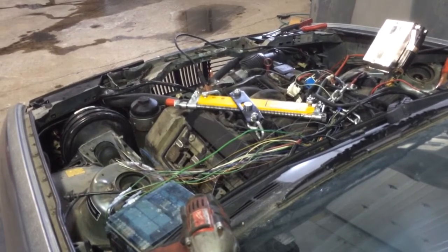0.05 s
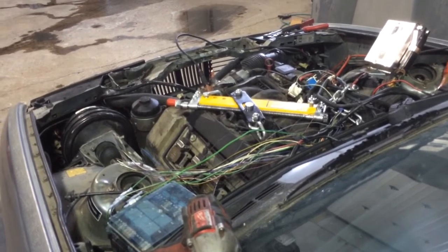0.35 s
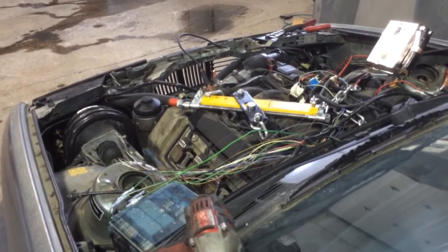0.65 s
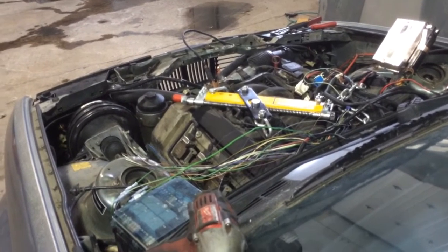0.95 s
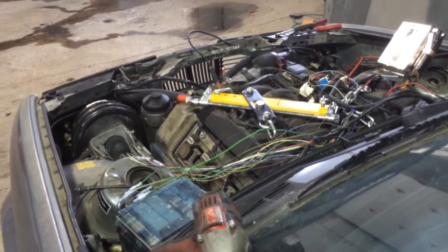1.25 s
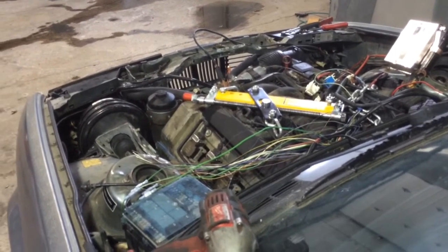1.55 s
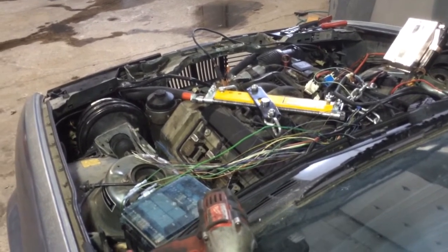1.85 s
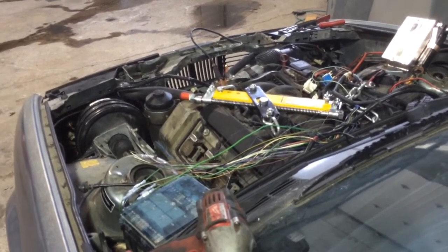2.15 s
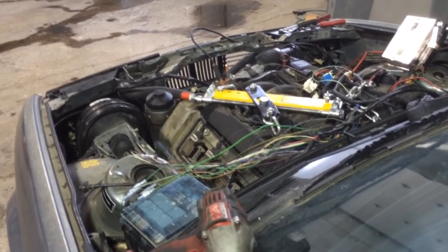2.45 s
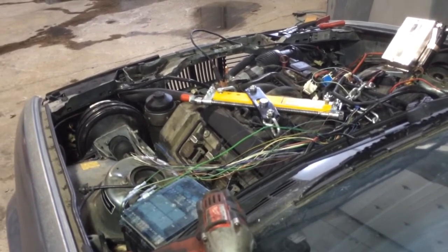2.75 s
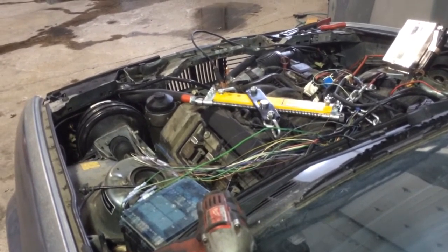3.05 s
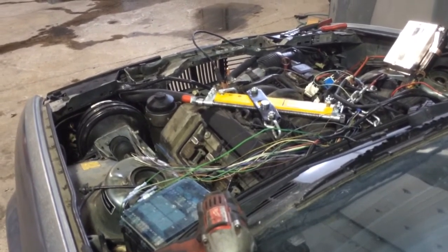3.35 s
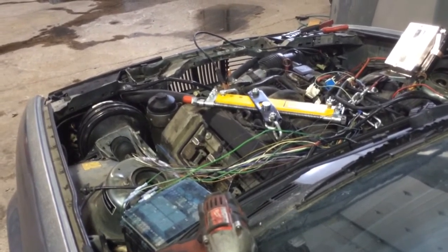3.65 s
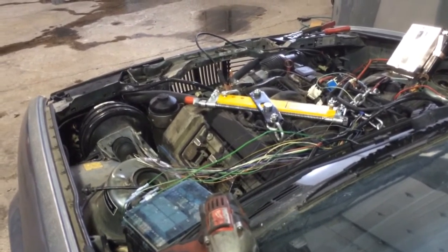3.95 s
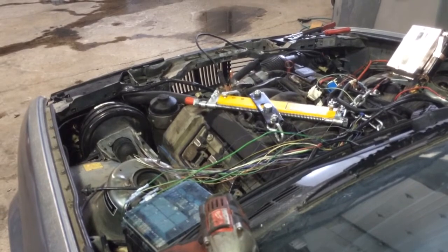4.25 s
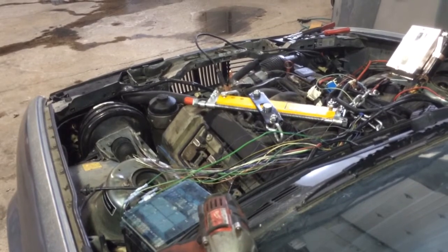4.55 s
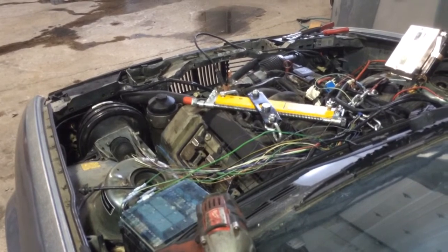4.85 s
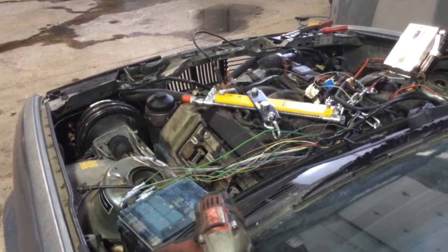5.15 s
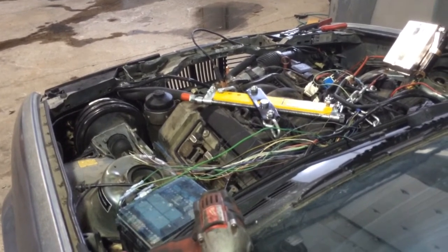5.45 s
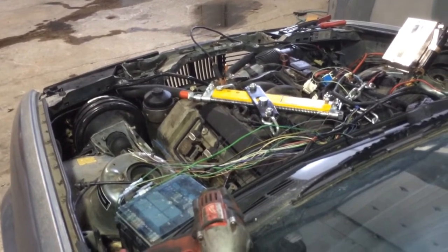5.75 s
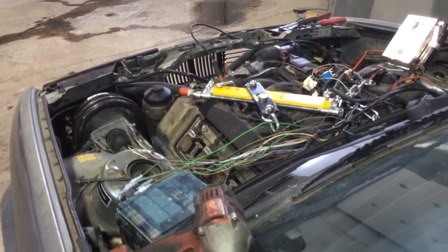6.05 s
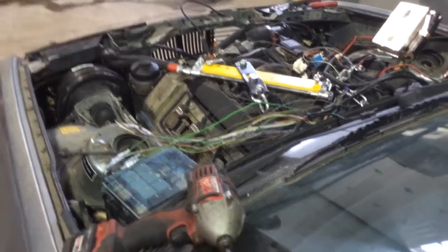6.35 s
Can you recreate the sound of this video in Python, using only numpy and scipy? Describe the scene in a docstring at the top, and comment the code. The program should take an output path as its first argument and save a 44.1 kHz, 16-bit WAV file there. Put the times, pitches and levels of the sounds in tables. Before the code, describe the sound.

Faint machinery hum and a few clicks, then a car engine cranks, fires up with spitting pops, roars and begins to ease off.

```python
"""A workshop yard, where machinery hums and an eight-cylinder engine is started with its bonnet open.
Switch contacts click, then the starter's pinion slams in and its teeth grind for half a second.
The engine catches, spits, flares into a lumpy roar and begins to fall back. Its firings drive the
resonances of pipe, muffler and metal covers; unequal cylinders make the roar lumpy, and misfires
and knocks crack out above it."""
import sys
import numpy as np
from scipy import signal
from scipy.fft import rfft, irfft, next_fast_len
from scipy.io import wavfile
from scipy.ndimage import map_coordinates

SR = 44100
rng = np.random.default_rng(int(sys.argv[2]) if len(sys.argv) > 2 else 0)


def wav_out(sig):
    """Save sig, one row per channel (or a flat mono array), as 16-bit PCM at SR to the path in sys.argv[1]."""
    wavfile.write(sys.argv[1], SR, np.round(np.clip(np.atleast_2d(sig).T, -1, 1) * 32767).astype(np.int16))


N = 281799
T = np.arange(N) / SR

# outdoor rumble: frequency_hz, level_db
YARD_SPECTRUM = [(12, -59), (20, -17), (30, -45), (38, -12), (122, -1.5), (245, -5.5), (266, -7.5),
                 (306, -9.5), (333, -12.5), (478, -11.5), (519, -17), (581, -15.5), (746, -17), (1920, -20),
                 (15500, -54.5)]
# machinery hum: pitch_hz, rms_db
HUM_PARTIALS = [(53.5, -58.5), (79, -55), (120, -55.5), (152, -61), (187, -56.5), (210, -61), (240, -62.5),
                (311, -64), (431, -77.5), (573, -70), (700, -75), (1680, -70.5), (1900, -82), (2400, -78.5)]
# machinery whirr: frequency_hz, gain_db
WHIRR_BAND = [(1400, -18), (1800, 0), (2000, 5), (2600, -30)]
# switch and relay contacts: start_s, level_db, body_db, snap_db
CLICKS = [(1.178, -27, -16, -10.5), (1.179, -25.5, -13, -15.5), (4.352, -28.5, -2, -25),
          (4.358, -25.5, -5, -30), (4.477, -28.5, -8.5, -12.5), (4.537, -46.5, 8.5, -24)]
# switch casing: pitch_hz, width_hz, gain_db
CASING_MODES = [(613, 50, 6), (870, 88, 7.5), (1380, 190, 4.5), (1950, 190, 11.5), (2270, 69, -5.5),
                (4300, 170, -48)]
# contact snap: frequency_hz, level_db
SNAP_SPECTRUM = [(1500, -3), (3000, -5), (4500, 1), (5800, -11), (7300, 1), (10000, -16), (15000, -7)]

# the solenoid throws the pinion into the ring gear: start_s, level_db, t60_s
SLAMS = [(4.562, -28, 0.23), (4.575, -12, 0.092), (4.583, -14, 0.1), (4.606, -29, 0.25)]
# pinion impact: frequency_hz, level_db
PINION_SPECTRUM = [(120, -53), (200, -21), (677, -7.5), (1050, -9), (1280, -5.5), (2060, -2.5),
                   (2290, -8.5), (3480, 0), (3750, -10), (4660, -6), (5800, -11), (14400, -26.5),
                   (15500, -30)]
# the block taking the load: pitch_hz, width_hz, gain_db
BLOCK_MODES = [(94.8, 60, -8), (720, 53, 1), (870, 43, 5), (1130, 90, 0), (1470, 56, -20), (2110, 94, -19)]
# the starter labours over each compression: centre_s, swell_db, whine_db
COMPRESSIONS = [(4.7, 1, -28.5), (4.806, 3, -24.5), (4.925, 2.5, -31), (5.028, 5, -26)]
# rattling housing: frequency_hz, gain_db
HOUSING_SPECTRUM = [(180, -19.5), (300, -11.5), (391, -18.5), (526, -8), (581, -16), (674, -7), (863, -3),
                    (1050, -5.5), (1370, -1.5), (2070, -5), (2690, -11), (4880, -14.5), (8280, -28.5),
                    (13100, -30), (15500, -45)]
# bell housing: pitch_hz, width_hz, gain_db
BELL_MODES = [(705, 56, 1), (866, 61, 6), (1333, 130, -2.5)]
# its growl: frequency_hz, gain_db
GROWL_BAND = [(420, -35), (650, 8.5), (1400, 1.0), (2800, -29)]
# gear whine: tooth_rate_multiple, level_db
GEAR_HARMONICS = [(2, 3.5), (3, 2.5), (4, 5.5), (5, 5), (6, -3)]

# engine speed: time_s, four_stroke_cycle_hz
CYCLE_RATE = [(4.55, 4), (5.05, 5), (5.14, 8.9), (5.45, 9.7), (5.62, 11.45), (5.77, 12.08), (6.1, 11.95),
              (6.2, 10.8), (6.39, 9.5)]
# the pipe chuffs during cranking: start_s, level_db, t60_s
CHUFFS = [(4.592, -28, 0.27), (4.785, -22.5, 0.68), (4.915, -26.5, 0.53), (5.075, -23.5, 0.25)]
# unequal cylinders fill the orders around the eighth, the firing rate: cycle_rate_multiple, level_db
ENGINE_ORDERS = [(3, -2.5), (4, -4.5), (5, -9), (6, -1.5), (7, -5), (8, 3), (9, -8), (10, -6), (11, -9),
                 (12, -3.5), (13, -3.5), (14, -4), (15, -5.5), (16, -2.5), (17, -16), (18, -13), (19, -2.5),
                 (20, -11.5), (21, -9), (22, -31), (23, -16), (24, -12), (25, -19), (26, -8.5), (27, -12),
                 (28, -13.5), (29, -8.5), (31, -15), (32, -14), (33, -26), (37, -21.5), (38, -13),
                 (44, -12.5), (46, -19)]
# cylinders in firing order: strength_db
CYLINDERS = [2.5, 2.5, -0.5, 2, 3.5, -0.5, -4.5, 2]
# exhaust boom of the running engine: time_s, level_db
BOOM_LEVELS = [(5.15, -16.5), (5.166, -12), (5.44, -10.5), (5.684, -14.5), (6.096, -12.5), (6.206, -16.5),
               (6.238, -23.5), (6.39, -14.5)]
# exhaust pipe: pitch_hz, width_hz, gain_db
PIPE_MODES = [(116.5, 9.8, 6.5), (185, 400, -13.5)]
# muffler: pitch_hz, width_hz, gain_db
MUFFLER_MODES = [(175, 61, -4.5), (240, 49, 7.5), (321.7, 34, 0.5), (368, 65, -19), (512, 36, -5.5),
                 (711, 73, -3.5)]
# its burble: frequency_hz, gain_db
BURBLE_BAND = [(90, -29), (150, 1.5), (750, 2.0), (1500, -16)]
# intake air: frequency_hz, level_db
INTAKE_SPECTRUM = [(2000, -15), (5000, 0), (9000, -4), (15000, -14)]
# parts around the engine: frequency_hz, gain_db
BAY_SPECTRUM = [(350, -12.5), (600, -2.5), (726, -6), (809, -10), (1020, -6), (1220, -1.5), (1390, -7),
                (1910, -6), (2470, -12), (3160, -9), (3520, -12), (4090, -13), (6950, -17), (14500, -31),
                (15500, -31)]
# covers and brackets: pitch_hz, width_hz, level_db
COVER_MODES = [(1125, 17.7, 0.5), (1488, 18, 1), (1595, 39, 1.5), (1784, 22, -1), (1860, 29, -0.5),
               (2123, 28, 0.5), (2322, 32, 1.5), (2494, 17, -8), (2700, 19, -7), (3090, 80, -8)]

# single misfires, most as the engine catches: start_s, level_db, treble_db, ring_hz
MISFIRES = [(5.1285, -17, -4, 1746), (5.161, -15, -13, 1520), (5.2268, -12, -10, 1898),
            (5.252, -16.5, -0.5, 2340), (5.2977, -17, -10.5, 1470), (5.3193, -15, -15, 1447),
            (5.3994, -19.5, 3, 1540), (5.654, -9.5, -12.5, 1910), (6.121, -15, -18, 1840)]
# three cylinders knock under load: cycle_fraction, spit_db, crack_db, thud_db
KNOCKS = [(0.0, -17.5, -27, -37), (0.2, -30, -28, -25.5), (0.485, -27, -18, -23)]
# ring of a spit: pitch_hz, level_db
SPIT_PARTIALS = [(735, -13), (1130, -4), (1215, 1), (1300, -4)]
# hollow part of a knock: pitch_hz, width_hz, gain_db
THUD_MODES = [(532, 36, 1), (722, 64, 0)]
# crack and hiss of a pop: frequency_hz, level_db
CRACK_SPECTRUM = [(300, -7), (800, -10), (1900, -1), (3500, 3.0), (6000, -4.0), (15000, -31)]
HISS_SPECTRUM = [(2000, -7), (5000, -2.5), (9000, -4.5), (15000, -8)]

ENGAGE_S, RELEASE_S = 4.595, 5.045  # the pinion is in mesh between these times
TOOTH_FIRST_HZ, TOOTH_FREE_HZ, SPIN_UP_S = 190.1, 441, 0.47  # the starter nears its free speed
COMPRESSION_S, SAG_HZ = 0.036, 10  # half-width of a compression; its drag on the tooth rate
GRIND_DB, GRIND_EASE_DB_PER_S, RELEASE_DB_PER_S = -24.5, 11.5, 29
CATCH_S, OPEN_S = 5.124, 0.45  # the engine catches; time the throttle takes to open
LIFT_S, CLOSE_S = 6.145, 0.16  # the throttle is let go; time it takes to shut
BARK_DB, BARK_RANGE_DB = -17.5, 17.5  # gain at full throttle; how much less when shut
BAY_DB, BAY_RISE_DB, BAY_DROP_DB = -24.5, 3, 12  # gain at full throttle; less at the catch; less shut
KNOCK_FROM_S, KNOCK_TO_S, KNOCK_TREBLE_DB, KNOCK_RING_HZ = 5.42, 6.11, -11.5, 1840


def amp(db):
    """Decibels as an amplitude ratio."""
    return np.exp(np.asarray(db) * (np.log(10) / 20))


def unit(x):
    """x at rms 1."""
    return x / np.sqrt(np.mean(x ** 2) + 1e-20)


def noise():
    """White Gaussian noise."""
    return rng.standard_normal(N)


def wobble(rate):
    """A smooth random curve, rate knots a second."""
    coarse = T[::64]
    knots = rng.standard_normal(int(N * rate / SR) + 4)
    return np.interp(T, coarse, map_coordinates(knots, [coarse * rate]))


def curve(points):
    """Linear interpolation of (time_s, value) points."""
    return np.interp(T, *np.transpose(points))


def ramp(start, length):
    """A linear rise from 0 to 1."""
    return np.clip((T - start) / length, 0, 1)


def burst(s, t60, attack=0.0013):
    """A fast rise and an exponential decay."""
    age = np.maximum(T - s, 0)
    return (1 - np.exp(-age / attack)) * amp(-60 * age / t60)


def filtered(x, response):
    """x through a complex frequency response."""
    size = next_fast_len(N + SR // 2)
    return irfft(rfft(x, size) * response(np.fft.rfftfreq(size, 1 / SR)), size)[:N]


def coloured(x, points):
    """x shaped by (frequency_hz, gain_db) points."""
    f, db = np.transpose(points)
    return filtered(x, lambda hz: amp(np.interp(np.log(hz + 1), np.log(f), db)))


def resonate(x, modes):
    """Forced response of damped resonators in parallel."""
    return filtered(x, lambda f: sum(amp(db) * 1j * f * width / (hz * hz - f * f + 1j * f * width)
                                     for hz, width, db in modes))


def steady(x, span):
    """x held near rms 1 over every span seconds."""
    window = np.hanning(int(span * SR))
    power = np.abs(signal.fftconvolve(x * x, window / window.sum(), "same"))
    return x / np.sqrt(power + power.max() / 10 ** 5)


def scatter(x, t60):
    """Diffuse reflection among the parts under the bonnet."""
    t = T[:SR // 4]
    tail = rng.standard_normal(len(t)) * amp(-60 * t / t60)
    return signal.fftconvolve(x, tail / np.linalg.norm(tail))[:N]


def crossings(phase):
    """The samples at which phase passes a whole number."""
    return np.flatnonzero(np.diff(np.floor(phase)) > 0)


def pulses(at, sizes):
    """Impulses at the given samples."""
    return np.bincount(np.clip(at, 0, N - 1).astype(int), sizes, N)


def puffs(train, t60):
    """Each impulse releases decaying turbulence."""
    decay = amp(-60 * T[:SR // 5] / t60)
    return signal.fftconvolve(train, decay)[:N] * noise()


def yard(rumble_db=-48.5, waver_db=2, drift_cycles=0.15, whirr_db=-67):
    """Superposition: the wavering partials and narrow-band whirr of machinery over outdoor rumble."""
    hum = sum(amp(db + waver_db * wobble(3.92))
              * np.sin(2 * np.pi * (hz * T + drift_cycles * wobble(3.046))) for hz, db in HUM_PARTIALS)
    whirr = unit(coloured(resonate(noise(), [(1891, 38, 0)]), WHIRR_BAND))
    rumble = unit(coloured(noise(), YARD_SPECTRUM))
    return np.sqrt(2) * hum + amp(whirr_db) * whirr + amp(rumble_db) * rumble


def switches(body_gain_db=-2, snap_gain_db=1, body_t60=0.06, snap_t60=0.056):
    """Impact excitation: each contact snaps and rings the modes of its casing."""
    body = sum(amp(db + body_db) * burst(s, body_t60) for s, db, body_db, _ in CLICKS)
    snap = sum(amp(db + snap_db) * burst(s, snap_t60, attack=0.00087) for s, db, _, snap_db in CLICKS)
    body *= unit(resonate(noise(), CASING_MODES))
    snap *= unit(coloured(noise(), SNAP_SPECTRUM))
    return amp(body_gain_db) * body + amp(snap_gain_db) * snap


def pinion_slam(clunk_db=-17, clunk_t60=0.18):
    """Impact transients: the pinion strikes the ring gear, and the block rings as it takes the load."""
    strikes = sum(amp(db) * burst(s, t60, attack=0.0055) for s, db, t60 in SLAMS)
    slam = strikes * unit(coloured(noise(), PINION_SPECTRUM))
    block = steady(resonate(noise(), BLOCK_MODES), 0.1)
    return slam + amp(clunk_db) * burst(4.604, clunk_t60, attack=0.00088) * block


def starter(growl_db=-5, uneven_db=2, ring_t60=0.096, scrape=0.075):
    """Forced vibration: meshing teeth drive the housing, slower and harder on each compression."""
    age = np.maximum(T - ENGAGE_S, 0)
    centre_s, swell_db, whine_db = np.transpose(COMPRESSIONS)
    squeeze = np.exp(-((T - centre_s[:, None]) / COMPRESSION_S) ** 2)
    tooth_hz = TOOTH_FREE_HZ - (TOOTH_FREE_HZ - TOOTH_FIRST_HZ) * np.exp(-age / SPIN_UP_S)
    tooth_hz -= SAG_HZ * squeeze.sum(0)
    mesh = np.cumsum(tooth_hz * (1 + .022 * wobble(110))) / SR
    at = crossings(mesh)
    teeth = pulses(at + rng.normal(0, 7, len(at)), amp(uneven_db * rng.standard_normal(len(at))))
    contact = scatter(teeth, ring_t60) + scrape * puffs(teeth, 0.02)
    grind = steady(coloured(contact, HOUSING_SPECTRUM), 0.035)
    growl = steady(coloured(resonate(puffs(teeth, 0.0096), BELL_MODES), GROWL_BAND), 0.052)
    tones = sum(amp(db + 1.2 * wobble(25)) * np.sin(2 * np.pi * k * mesh) for k, db in GEAR_HARMONICS)
    whine = (amp(whine_db) @ squeeze) * steady(resonate(tones, BELL_MODES), 0.047)
    level_db = GRIND_DB - GRIND_EASE_DB_PER_S * age + swell_db @ squeeze  # eases as the engine turns
    rattle = amp(level_db) * (grind + amp(growl_db) * growl)
    engaged = ramp(ENGAGE_S, 0.0063) * amp(-RELEASE_DB_PER_S * np.maximum(T - RELEASE_S, 0))
    return engaged * (rattle + whine)


def crank(zero_s=5.883):
    """Phase integrates speed: four-stroke cycles, counted from the first cylinder's firing at zero_s."""
    cycle = np.cumsum(curve(CYCLE_RATE)) / SR
    return cycle - np.interp(zero_s, T, cycle)


def throttle():
    """From 0 (shut) to 1: opened as the engine catches, held, then let go."""
    return ramp(CATCH_S, OPEN_S) * (1 - ramp(LIFT_S, CLOSE_S))


def firings(jitter_s=.0007, uneven_db=4.0):
    """A quasi-periodic pulse train: eight firings a cycle, each early or late, weak or strong."""
    phase = len(CYLINDERS) * crank()
    at = crossings(phase)
    cylinder_db = np.array(CYLINDERS)[np.round(phase[at]).astype(int) % len(CYLINDERS)]
    late, strength = rng.standard_normal((len(at), 2)).T
    return pulses(at + jitter_s * SR * late, amp(cylinder_db + uneven_db * strength))


def exhaust(upper_db=-0.5, burble_db=-7, waver_db=2.5, split_hz=150, cough_db=-7, cough_t60=0.13):
    """Resonance: engine orders sweep through the pipe's modes; throttle adds bark and misfires cough."""
    cycle = crank()
    gas = sum(amp(db + waver_db * wobble(16))
              * np.sin(2 * np.pi * (k * cycle + rng.random()) + 0.23 * wobble(14))
              for k, db in ENGINE_ORDERS)
    pipe = resonate(gas, PIPE_MODES)
    low = filtered(pipe, lambda f: 1 / (1 + (f / split_hz) ** 8))
    boom = steady(low, .07)
    blows = firings()
    burble = coloured(resonate(blows + 0.056 * puffs(blows, 0.015), MUFFLER_MODES), BURBLE_BAND)
    bark = amp(upper_db) * steady(pipe - low, 0.14) + amp(burble_db) * steady(burble, 0.13)
    running = ramp(CATCH_S, 0.01)
    chuffs = sum(amp(db) * burst(s, t60, attack=0.0098) for s, db, t60 in CHUFFS)
    coughs = sum(amp(db + treble_db + cough_db) * burst(s, cough_t60) for s, db, treble_db, _ in MISFIRES)
    load = amp(BARK_DB - BARK_RANGE_DB * (1 - throttle()))
    return (chuffs + running * amp(curve(BOOM_LEVELS))) * boom + (coughs + running * load) * bark


def intake(air_db=-39):
    """Flow noise: air starts to hiss past the throttle just before the engine catches."""
    flow = ramp(4.92, 0.15) * (1 - ramp(5.6, .3))
    return amp(air_db) * flow * unit(coloured(noise(), INTAKE_SPECTRUM))


def engine_bay(rasp_db=-2.5, clatter_db=-5, metal_db=-5, waver_db=4, clatter_t60=0.32, throb_db=0.5):
    """Structure-borne sound: firings rasp and rattle nearby parts, throbbing once a crankshaft turn."""
    blows = firings(jitter_s=.00006, uneven_db=1.5)
    rasp = amp(rasp_db) * steady(coloured(puffs(blows, 0.39), BAY_SPECTRUM), 0.26)
    # parts ring alike on every firing, which gives a line spectrum
    clatter = amp(clatter_db) * steady(coloured(scatter(blows, clatter_t60), BAY_SPECTRUM), 0.32)
    # each cover rings on after a firing, now harder, now softer
    struck = signal.fftconvolve(blows, burst(0, .07)[:SR // 4])[:N]
    rings = sum(amp(db + waver_db * wobble(30)) * np.sin(2 * np.pi * hz * T + 1.73 * wobble(2 * width))
                for hz, width, db in COVER_MODES)
    metal = amp(metal_db) * steady(struck * rings, 0.41)
    turns = 2 * (crank() - 0.12)
    level_db = BAY_DB - BAY_RISE_DB * (1 - ramp(CATCH_S, OPEN_S)) - BAY_DROP_DB * ramp(LIFT_S, CLOSE_S)
    level_db += throb_db * throttle() * np.cos(2 * np.pi * turns)
    return ramp(CATCH_S, 0.018) * amp(level_db) * (rasp + clatter + metal)


def knocks(spread_db=1.6):
    """Knocks recur with the cycle; a row for each: start_s, spit_db, crack_db, thud_db."""
    cycle = crank()
    rows = [(s, *levels_db) for place, *levels_db in KNOCKS
            for s in T[crossings(cycle - place)] if KNOCK_FROM_S < s < KNOCK_TO_S]
    return np.array(rows) + spread_db * rng.standard_normal((len(rows), 1)) * [0, 1, 1, 1]


def spits(gain_db=3, t60=0.061, attack=0.0019, misfire_db=-11, thud_t60=0.094):
    """Damped ringing: misfires and knocks spit with a brief pitch; knocks also thud hollowly."""
    tones = sum(amp(db) * np.sin(2 * np.pi * hz * T + 1.87 * wobble(120)) for hz, db in SPIT_PARTIALS)
    knock_rows = knocks()
    blows = [(s, db) for s, db, _, _ in knock_rows] + [(s, db + misfire_db) for s, db, _, _ in MISFIRES]
    spit = steady(tones, 0.026) * sum(amp(db) * burst(s, t60, attack) for s, db in blows)
    thuds = sum(amp(db) * burst(s, thud_t60, attack) for s, _, _, db in knock_rows)
    return amp(gain_db) * spit + thuds * steady(resonate(noise(), THUD_MODES), .04)


def pops(crack_db=-7, hiss_db=-5, ring_db=-8, crack_t60=0.076, hiss_t60=0.15, ring_t60=0.067):
    """Impulsive excitation: misfires and knocks crack and hiss over a broad band and ring the metal."""
    t = T[:SR // 6]
    rise = 1 - np.exp(-t / 0.002)
    crack, hiss, ring = np.zeros((3, N))
    knock_pops = [(s, db, KNOCK_TREBLE_DB, KNOCK_RING_HZ) for s, _, db, _ in knocks()]
    for s, db, treble_db, hz in list(MISFIRES) + knock_pops:
        span = slice(round(s * SR), round(s * SR) + len(t))
        crack[span] += rise * amp(db - 60 * t / crack_t60)
        hiss[span] += rise * amp(db + treble_db - 60 * t / hiss_t60)
        ring[span] += rise * amp(db - 60 * t / ring_t60) * np.sin(2 * np.pi * hz * t)
    ring *= unit(filtered(noise(), lambda f: 1 / (1 + (f / 130) ** 4)))  # a band 260 Hz wide
    crack *= unit(coloured(noise(), CRACK_SPECTRUM))
    hiss *= unit(coloured(noise(), HISS_SPECTRUM))
    return amp(crack_db) * crack + amp(hiss_db) * hiss + amp(ring_db) * np.sqrt(2) * ring


def scene():
    """Superposition: the pressures of all sources add in one channel."""
    starting = switches() + starter() + pinion_slam()
    engine = intake() + exhaust() + engine_bay() + spits() + pops()
    return (yard() + starting + engine)[None]


def record(dry, ceiling=0.62, top_hz=15550):
    """Saturation and band limiting: the microphone rounds the highest peaks and cuts the top treble."""
    soft = dry[0] / (1 + np.abs(dry[0] / ceiling) ** 6) ** (1 / 6)
    return filtered(soft, lambda hz: np.clip((top_hz - hz) / 200 + .5, 0, 1))[None]


dry = scene()
out = record(dry)
wav_out(out)
```